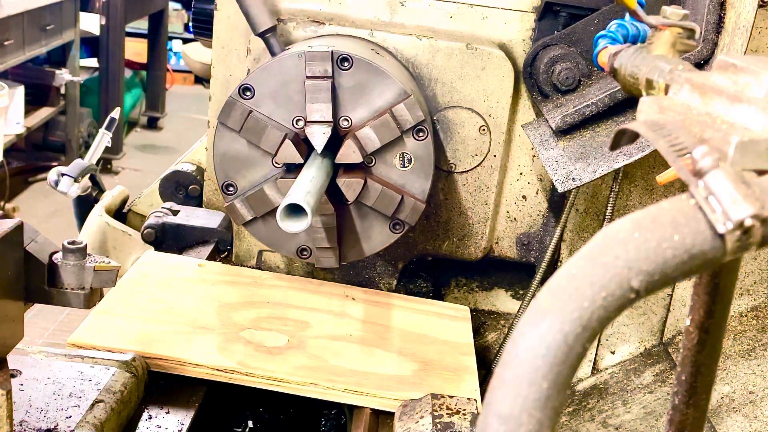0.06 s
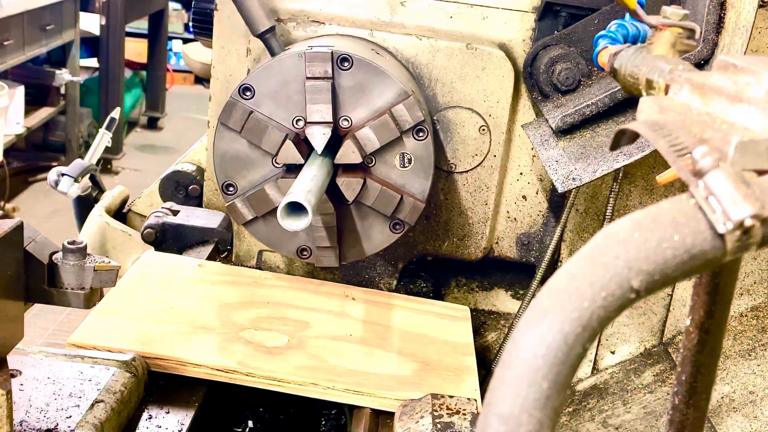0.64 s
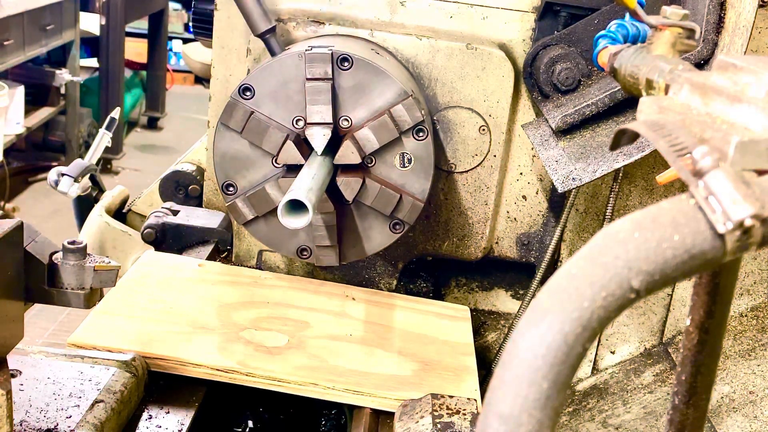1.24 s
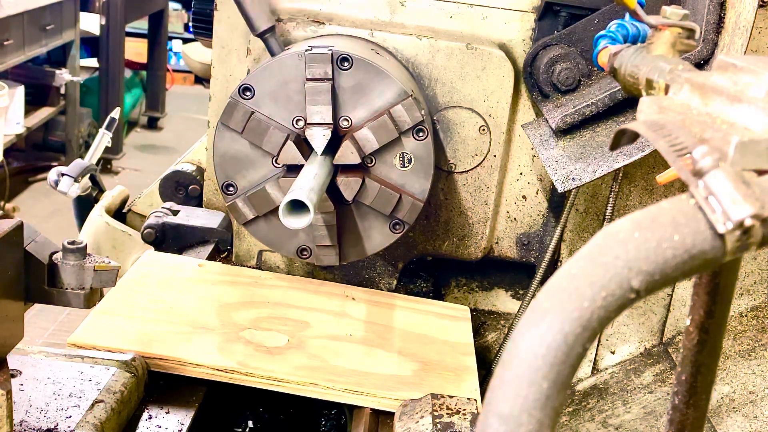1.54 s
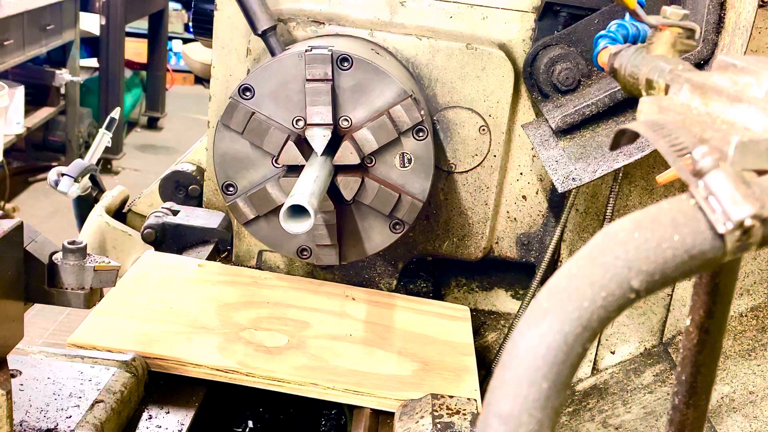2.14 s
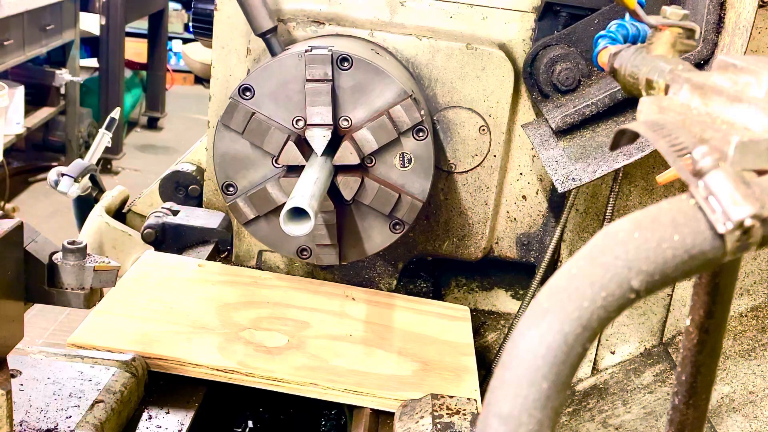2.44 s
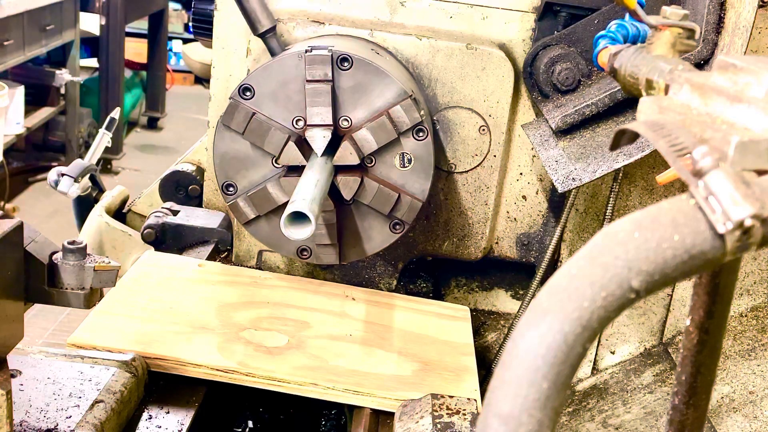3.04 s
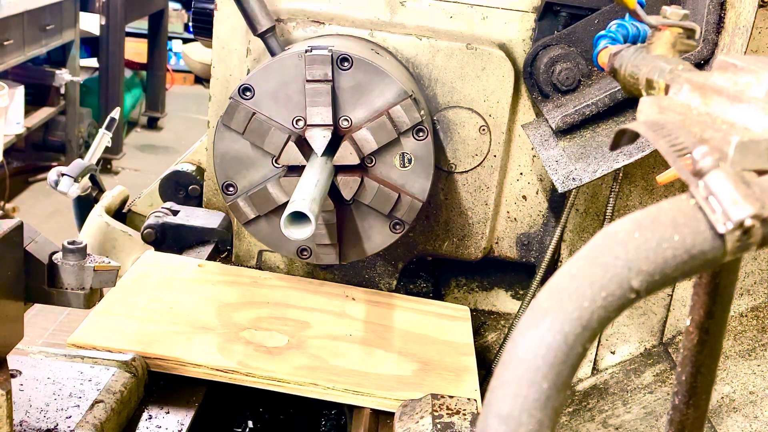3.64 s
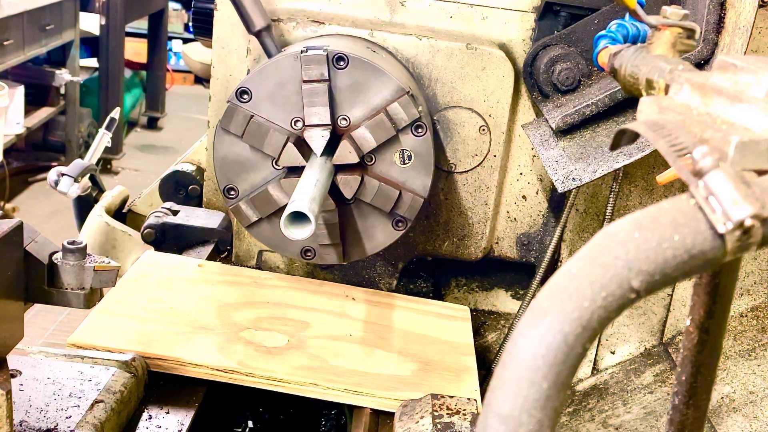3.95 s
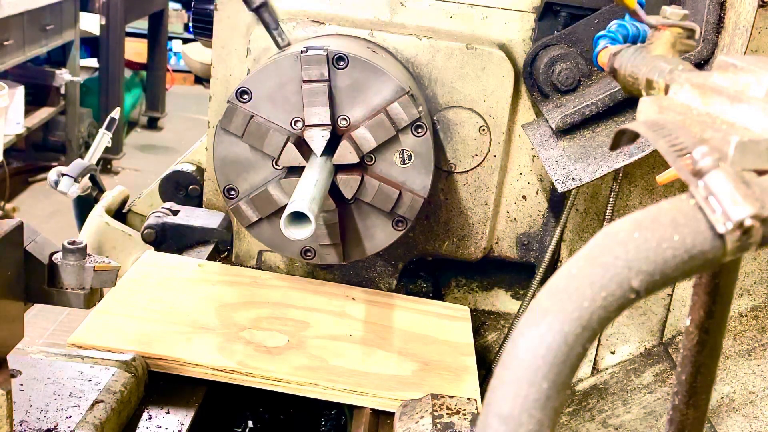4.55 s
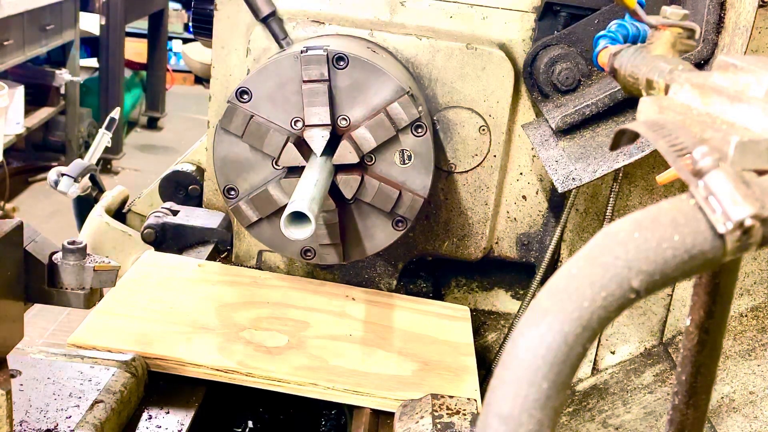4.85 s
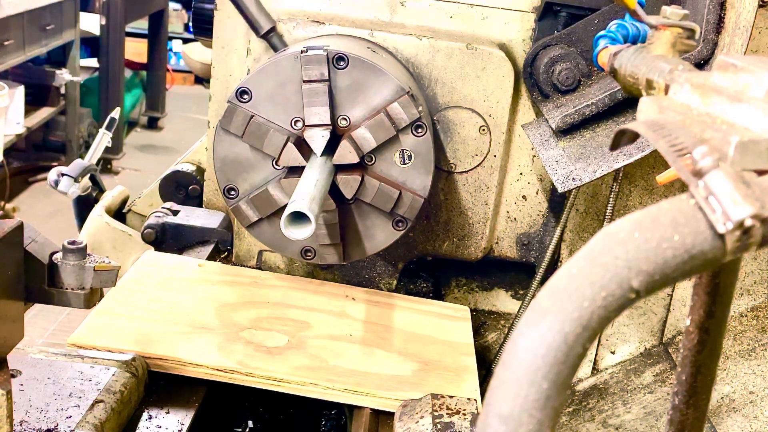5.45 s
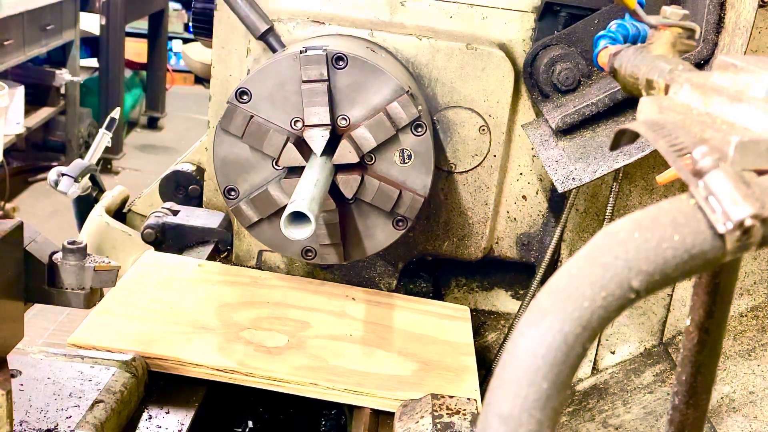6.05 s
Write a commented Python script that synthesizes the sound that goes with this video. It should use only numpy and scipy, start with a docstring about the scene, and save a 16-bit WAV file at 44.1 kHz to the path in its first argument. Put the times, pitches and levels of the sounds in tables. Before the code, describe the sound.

Soft metal knocks from a hand-turned lathe chuck, then three sharp ringing tool clanks and a heavy clunk over a low workshop hum.

```python
"""A lathe chuck is eased round by hand in a humming workshop. Until 3.7 s its drive knocks softly
through the slack, loose parts ring and the spindle rumbles. At 4 s a steel tool scrapes the chuck;
from 4.7 s it clanks against it three times, hardest the last time. A final clunk follows at 5.8 s.
Every blow wakes the lathe's body, scatters off the machine close by and dies away in the shop."""
import sys
import numpy as np
from scipy import signal
from scipy.fft import rfft, irfft
from scipy.io import wavfile

SR = 44100
rng = np.random.default_rng(int(sys.argv[2]) if len(sys.argv) > 2 else 0)


def wrap_up_sound(samples):
    """Save the sound to the file named by the first command line argument, as 16-bit audio."""
    columns = np.atleast_2d(samples).T
    # keep every value between -1 and 1, then stretch to whole-number steps
    tamed = np.clip(columns, -1, 1)
    steps = np.round(tamed * 32767).astype(np.int16)
    wavfile.write(sys.argv[1], SR, steps)


N = 277830

# Tool blows: (time [s], thud level [dB], thud pitch [Hz], clack level [dB], hardness [dB/octave])
CLANKS = [(4.6703, 9.5, 304, 10.5, -4), (4.9413, 10.5, 300, 3.5, 0.5), (5.2328, 18, 365, 14.5, 3)]
# Tool-on-chuck clack: (frequency [Hz], gain [dB])
CLANK_SPECTRUM = [(150, -13.5), (500, -0.5), (1200, 0.5), (2500, -0.5), (3700, -13.5), (5200, -9.5),
                  (6800, -17.5), (8300, -11), (9800, -28), (12500, -23)]
# Headstock resonances and dips: (centre [Hz], width [Hz], gain [dB])
HEADSTOCK_RESONANCES = [(336.5, 170, 5), (559, 170, -3.5), (754, 48, 5.5), (3340, 670, -1),
                        (11500, 500, -3), (13100, 640, -2.5)]

def tool_clanks(shop):
    """Steel strikes the chuck: crack, ringing modes, tick and shimmer."""
    out = np.zeros((2, N))
    for spot, (time_s, *contact) in enumerate(CLANKS):
        colour = contact_spectrum(CLANK_SPECTRUM, *contact)
        add(out, time_s, blow(colour, HEADSTOCK_RESONANCES, shop, rise_s=.001, body_db=-1.1, room_db=.34))
        add(out, time_s + .00077, steel_ring(spot, shop))
        add(out, time_s + .0014, tick(colour))
        add(out, time_s + .0015, shimmer(colour))
    return out


# Steel modes: (frequency [Hz], t60 [s], level at spot 0 [dB], at spot 1 [dB], at spot 2 [dB])
STEEL_MODES = [(1870, .08, -29, -31, -33), (2440, .06, -33, -42, -24), (2520, .048, -30, -41, -9),
               (2680, .06, -28, -35, -27), (4580, .036, -30, -22, -38), (4950, .025, -48, -32, -25),
               (6140, .11, -50, -55, -27), (6560, .05, -45, -55, -36), (7060, .06, -58, -50, -31),
               (7900, .08, -43, -50, -26), (8200, .06, -52, -50, -26), (9200, .08, -62, -55, -30),
               (10760, .05, -46, -47, -25), (10950, .05, -50, -50, -28), (12200, .06, -50, -39, -26),
               (13870, .07, -70, -60, -26)]

def steel_ring(spot, shop, rise_s=.00069, twin_db=-9, size=8192):
    """Close mode pairs, damped by the hand; the shop holds each tone much longer."""
    t, out = np.arange(size) / SR, np.zeros((2, 2 * SR))
    for hz, t60, *spot_db in STEEL_MODES:
        phase, twin_phase = rng.uniform(0, 2 * np.pi, (2, 1, 1)) + .17 * rng.standard_normal((2, 2, 1))
        twin_hz = hz + 30 * np.sqrt(hz / 2500) * rng.choice([-1, 1])
        pair = np.sin(2 * np.pi * hz * t + phase)
        pair += gain_of(twin_db) * np.sin(2 * np.pi * twin_hz * t + twin_phase)
        envelope = gain_of(spot_db[spot] + 3 - 60 * t / t60) * (1 - np.exp(-t / rise_s))
        ring = unit_rms(pair * envelope) * np.sqrt(np.mean(envelope ** 2) / 2)
        add(out, 0, ring)
        add(out, 0, gain_of(read(SHOP_GAIN, hz)) * equal_energy_echo(ring, shop))
    return out


def tick(colour, level_db=-5, size=2048):
    """Steel meets steel: one bright, dry spike."""
    hz = bins(size)
    highpass_db = -10 * np.log10(1 + (3500 / (hz + 50)) ** 2)
    spike = filtered(signal.unit_impulse(size), read(colour, hz) + level_db + highpass_db)
    return np.array([spike, spike])


def shimmer(colour, level_db=-55, mean_t60_s=.31, count=60, size=20000):
    """Faint high modes of jaws, handles and guards, driven by the blow's treble."""
    t, out = np.arange(size) / SR, np.zeros((2, size))
    for hz in np.geomspace(2900, 14000, count):
        detune, life, strength = rng.random(3)
        mode_hz = hz * (1 + .056 * (detune - .5))
        mode_db = level_db + read(colour, hz) + 17 * (strength - 2)
        envelope = gain_of(mode_db - 60 * t / (mean_t60_s * (.5 + life)))
        out += envelope * np.sin(2 * np.pi * (mode_hz * t + rng.random((2, 1))))
    return out


# Scrape envelope: (time [s], level [dB])
SCRAPE_LEVEL = [(3.96, -78), (3.99, -63), (4.005, -49), (4.03, -57.5), (4.05, -74), (4.09, -88)]
# Steel rasp: (frequency [Hz], gain [dB])
SCRAPE_SPECTRUM = [(400, -21), (750, 14.5), (1400, -16), (1900, 5.5), (2200, -4), (2600, 6.5), (3400, -15),
                   (4200, -16), (4600, 1.5), (5400, -15), (6500, -9), (13000, -26)]

def tool_scrape(shop, grain_db=4, room_db=-2):
    """Tiny slips of steel on steel."""
    slips = noise_pair(N, MACHINE_COHERENCE) * gain_of(grain_db * drift(120))
    level_db = np.interp(np.arange(N) / SR, *np.transpose(SCRAPE_LEVEL), left=-np.inf, right=-np.inf)
    rasp = shaped_noise(slips, SCRAPE_SPECTRUM) * gain_of(level_db)
    return rasp + gain_of(room_db) * signal.fftconvolve(rasp, shop, axes=1)[:, :N]


# Drive knocks: (time [s], thud level [dB], thud pitch [Hz], clack level [dB], hardness [dB/octave])
KNOCKS = [(0.188, -8, 380, -21.5, 2.5), (0.399, -5, 400, -17, 1.5), (0.417, 2, 410, -32, -1),
          (0.497, 1, 340, -23, -4), (0.671, -6, 380, -13.5, -3.5), (0.683, 6, 170, -8, -7),
          (0.712, 1.5, 398, -29, 2.5), (0.892, -0.5, 405, -35, 0), (1.111, -1, 168, -10.5, 0),
          (1.124, 10, 224, -7.5, -4), (1.163, 1, 330, -13, -.5), (1.197, 7, 202, -15, -6),
          (1.384, -9, 160, -19.5, 0.5), (1.61, 4, 200, -3, -1.7), (1.628, -2, 380, -5, 5),
          (1.635, 19, 150, -3, 2.7), (1.797, 3, 204, -12.5, -7.5), (2.265, -2, 380, -21, 2.5),
          (2.298, 3.5, 200, -11, -8), (2.375, 2, 160, -14, -16), (2.853, -3.5, 298, -16, -9),
          (2.875, -2, 382, -21, -9), (2.895, -7, 170, -17, -5), (3.064, -3.5, 380, -21, -5),
          (3.17, 1, 313, -32, -6), (3.521, -1, 150, -19, -2.5), (3.631, -6, 300, -16, -5),
          (5.783, 7, 130, -9.5, -1.5), (5.799, 17.5, 91, -0.5, 0), (5.805, 3.5, 380, -0.5, 1.5),
          (5.826, 9.5, 158, -5, 1)]
# Clack of the slack closing: (frequency [Hz], gain [dB])
KNOCK_SPECTRUM = [(140, -11), (380, 1), (1050, 0.5), (2900, -10.5), (6000, -12.5), (10800, -23.5)]
# Chuck resonances and dips: (centre [Hz], width [Hz], gain [dB])
CHUCK_RESONANCES = [(408, 74, 6.5), (1115, 290, 5.5), (1600, 740, -5.5), (2700, 660, 9.5), (3640, 350, 9),
                    (4530, 3300, -4.5), (6230, 1400, 6.5), (9300, 480, 8)]

def drive_knocks(shop):
    """The drive takes up its slack; the last four knocks merge into the clunk."""
    out = np.zeros((2, N))
    for time_s, *contact in KNOCKS:
        colour = contact_spectrum(KNOCK_SPECTRUM, *contact)
        add(out, time_s, blow(colour, CHUCK_RESONANCES, shop, rise_s=.00054, body_db=-4.5, room_db=-3))
    return out


# Loose-part tones: (time [s], frequency [Hz], level [dB], t60 [s])
LOOSE_RINGS = [(0.189, 2700, -58, .06), (0.684, 1050, -47, .06), (1.164, 1170, -46, .07),
               (1.635, 1340, -47, .15), (1.635, 2570, -45, .22), (1.635, 6130, -52, .2),
               (2.299, 1130, -47, .07), (3.064, 3560, -55, .035), (3.631, 3600, -53, .035),
               (3.631, 1130, -52, .07), (5.799, 2400, -38, .04), (5.806, 2640, -37, .04),
               (5.805, 2826, -48, .5), (5.826, 3860, -53, .15), (5.826, 6864, -60, .25)]

def loose_parts(shop):
    """Loose parts ring on after some knocks."""
    t, out = np.arange(SR // 2) / SR, np.zeros((2, N))
    for time_s, hz, db, t60 in LOOSE_RINGS:
        ring = gain_of(db - 60 * t / t60) * np.sin(2 * np.pi * hz * t + rng.random((2, 1)))
        add(out, time_s, ring)
        add(out, time_s, .5 * equal_energy_echo(ring, shop))
    return out


def contact_spectrum(clack_spectrum, thud_db, thud_hz, clack_db, hardness_db_oct, hard_above_hz=1020):
    """Weight makes a thud; harder, shorter contact lifts the treble: (frequency [Hz], gain [dB])."""
    hz = np.geomspace(40, 16000, 120)
    octaves = np.log2(hz / thud_hz)
    slope_db_oct = np.where(octaves < 0, -6.5, -13.5)
    thud = gain_of(thud_db + slope_db_oct * abs(octaves))
    tilt_db = hardness_db_oct * np.log2(np.maximum(hz / hard_above_hz, 1))
    clack = gain_of(clack_db + read(clack_spectrum, hz) + tilt_db)
    return np.c_[hz, 20 * np.log10(np.hypot(thud, clack))]


# Crack decay: (frequency [Hz], t60 [s])
CRACK_T60 = [(120, 0.17), (400, 0.19), (1200, 0.13), (3000, 0.12), (12000, 0.036)]
# Left-right likeness of machine noise: (frequency [Hz], coherence [0..1])
MACHINE_COHERENCE = [(100, .95), (400, 0.7), (800, 0.06), (2500, 0.88), (5500, 0.6), (7200, .55), (8000, 1)]

def blow(colour, resonances, shop, rise_s, body_db, room_db, size=16384):
    """A crack scattered by the machine, its echo in the shop and the body's ring."""
    hz = bins(size)
    lowpass_db = -10 * np.log10(1 + (hz / 14200) ** 40)  # finite contact time
    highpass_db = -10 * np.log10(1 + (75 / (hz + 1)) ** 4)
    db = read(colour, hz) + lowpass_db + highpass_db
    for centre_hz, width_hz, peak_db in resonances:
        db += peak_db / (1 + (2 * (hz - centre_hz) / width_hz) ** 2)
    crack = filtered(noise_burst(size, MACHINE_COHERENCE, CRACK_T60, rise_s), db)
    out = gain_of(room_db) * signal.fftconvolve(crack, shop, axes=1)
    add(out, 0, crack)
    add(out, 0, body_ring(colour, body_db, size))
    return out


# Lathe body modes: (frequency [Hz], level [dB], t60 [s])
BODY_MODES = [(183, -55, .5), (320, -52, .5), (371, -53, .45), (420, -53, .4), (598, -58, .5),
              (743, -48, .42), (960, -52, .25), (1085, -54, .45), (1370, -53, .5), (1690, -50, .38),
              (2050, -54, .3), (2170, -55, .33), (2686, -57, .55)]

def body_ring(colour, level_db, size, rise_s=.0029):
    """The blow's spectrum drives each mode of the lathe's body."""
    t, out = np.arange(size) / SR, np.zeros((2, size))
    for hz, mode_db, t60 in BODY_MODES:
        phase = rng.uniform(0, 2 * np.pi) + .55 * rng.standard_normal((2, 1))
        decay = gain_of(level_db + mode_db + read(colour, hz) - 60 * t / t60)
        out += decay * (1 - np.exp(-t / rise_s)) * np.sin(2 * np.pi * hz * t + phase)
    return out


# Rumble envelope: (time [s], level [dB])
SPINDLE_LEVEL = [(0, -52.5), (.45, -55), (.9, -57.5), (1.4, -57), (1.8, -51), (2.1, -66), (2.4, -60.5),
                 (3.1, -61.5), (3.6, -58), (5.5, -66.5), (6.3, -61.5)]
# Spindle noise: (frequency [Hz], gain [dB])
SPINDLE_SPECTRUM = [(60, -26), (150, 2.5), (400, 2), (600, -10), (1200, -22.5), (2500, -28), (6000, -37.5)]

def spindle_rumble(flutter_db=4.04):
    """The turning spindle rumbles unevenly."""
    rumble = shaped_noise(noise_pair(N, MACHINE_COHERENCE), SPINDLE_SPECTRUM)
    level_db = np.interp(np.arange(N) / SR, *np.transpose(SPINDLE_LEVEL))
    return rumble * gain_of(level_db + flutter_db * drift(14))


# Motor tones: (frequency [Hz], level [dB])
MOTOR_TONES = [(32, -65.5), (57.7, -63), (64.7, -46), (120, -54), (199, -61.5), (240, -69), (292, -74.5),
               (359, -65), (592, -74.5)]

def motor_hum(waver_rad=.49, throb_db=.3):
    """Motors in the shop waver and beat against each other."""
    t, out = np.arange(N) / SR, np.zeros(N)
    for hz, db in MOTOR_TONES:
        amplitude = np.sqrt(2) * gain_of(db + throb_db * drift(4.5))
        out += amplitude * np.sin(2 * np.pi * hz * t + waver_rad * drift(3.4))
    return out


# Air noise: (frequency [Hz], gain [dB])
AIR_SPECTRUM = [(22, -25), (45, 0.5), (70, -2.5), (105, 1), (145, -12.5), (200, -10), (380, -18.5),
                (500, -22.5), (1000, -27.5), (2000, -36.5), (4000, -45), (6800, -45.5), (11500, -53),
                (15500, -44.5)]
# Its left-right likeness: (frequency [Hz], coherence [-1..1])
AIR_COHERENCE = [(60, 1), (130, 0.83), (290, 0.37), (640, -0.41), (1400, 0.014), (3100, 0.52), (6800, 0.41),
                 (8000, 1)]

def moving_air(level_db=-47):
    """Moving air makes a steady low rush."""
    return gain_of(level_db) * shaped_noise(noise_pair(N, AIR_COHERENCE), AIR_SPECTRUM)


# Reverb decay: (frequency [Hz], t60 [s])
SHOP_T60 = [(150, 0.64), (500, 0.57), (2500, 0.87), (6000, 0.7), (13000, 0.5)]
# Reverb tail colour: (frequency [Hz], gain [dB])
SHOP_GAIN = [(150, 8.5), (500, -6.5), (1500, -10.5), (3000, -11.5), (6000, -11), (13000, -14.5)]

def shop_response(predelay_s=.006, early_db=-9, size=40960):
    """Impulse response of the shop: early scatter and a diffuse tail."""
    coherence = [(100, 1), (700, .13), (2500, .47), (7000, .33), (8000, 1)]
    tail = filtered(noise_burst(size, coherence, SHOP_T60, rise_s=.0015), read(SHOP_GAIN, bins(size)))
    early = noise_burst(size, coherence, t60_table=[(200, .25), (8000, .23)], rise_s=.0091)
    return np.pad(tail + gain_of(early_db) * early, ((0, 0), (round(predelay_s * SR), 0)))


def equal_energy_echo(ring, shop):
    """The shop's echo of a tone, scaled to the tone's energy."""
    echo = signal.fftconvolve(ring, shop, axes=1)
    return echo * np.linalg.norm(ring) / np.linalg.norm(echo)


def noise_burst(size, coherence, t60_table, rise_s):
    """Stereo noise decaying at its own rate per band; roughly flat overall."""
    t, hz = np.arange(size) / SR, bins(size)
    spectrum = rfft(noise_pair(size, coherence))
    centres_hz = np.geomspace(120, 14000, 10)
    out = np.zeros((2, size))
    for centre_hz, one_hot in zip(centres_hz, np.eye(len(centres_hz))):
        weight = read(np.c_[centres_hz, one_hot], hz)
        envelope = (1 - np.exp(-t / rise_s)) * gain_of(-60 * t / read(t60_table, centre_hz))
        out += unit_rms(irfft(spectrum * weight) * envelope) * np.sqrt(np.mean(weight ** 2) / size)
    return out


def noise_pair(size, coherence):
    """Stereo white noise with the given coherence."""
    left, independent = rfft(rng.standard_normal((2, size)))
    shared = np.clip(read(coherence, bins(size)), -1, 1)
    right = shared * left + np.sqrt(1 - shared ** 2) * independent
    return irfft(np.array([left, right]), size)


def shaped_noise(noise, spectrum):
    """Scene-long noise coloured by a table, rms 1."""
    return unit_rms(irfft(rfft(noise) * gain_of(read(spectrum, bins(N))), N))


def drift(max_hz):
    """Smooth random wander, rms 1."""
    t = np.arange(0, N / SR + .02, .002)
    rates_hz = np.geomspace(max_hz / 10, max_hz, 20)
    sines = sum(np.sin(2 * np.pi * (hz * t + rng.random())) / np.sqrt(hz) for hz in rates_hz)
    return np.interp(np.arange(N) / SR, t, unit_rms(sines))


def filtered(x, db):
    """Minimum-phase filter, one gain per bin."""
    cepstrum = irfft(np.log(gain_of(db)))
    half = len(cepstrum) // 2
    cepstrum[1:half] *= 2
    cepstrum[half + 1:] = 0
    return irfft(rfft(x) * np.exp(rfft(cepstrum)))


def gain_of(db):
    """Decibels to amplitude."""
    return 10 ** (np.asarray(db) / 20)


def unit_rms(x):
    """Scales to rms 1."""
    return x / np.sqrt(np.mean(x ** 2) + 1e-20)


def read(table, hz):
    """Interpolates on a log-frequency axis."""
    table_hz, values = np.transpose(table)
    return np.interp(np.log(hz + 1), np.log(table_hz + 1), values)


def bins(size):
    """FFT bin frequencies [Hz]."""
    return np.fft.rfftfreq(size, 1 / SR)


def add(mix, time_s, sound):
    """Mixes in a stereo sound."""
    part = mix[:, round(time_s * SR):][:, :sound.shape[1]]
    part += sound[:, :part.shape[1]]


def scene():
    """Tool, chuck and background in one shop, all slightly to the right."""
    shop = shop_response()
    lathe = tool_scrape(shop) + tool_clanks(shop) + drive_knocks(shop) + loose_parts(shop)
    background = motor_hum() + moving_air() + spindle_rumble()
    return lathe * gain_of([[-.8], [.8]]) + background * gain_of([[-.9], [.8]])


# Left microphone port against right: (frequency [Hz], phase lead [rad])
PORT_PHASE = [(0, 0), (700, -.4), (1900, .4), (2700, 0), (3600, -.6), (4600, -.5), (5300, -1.4),
              (6100, -.5), (7200, -.4), (7700, 3.1), (9000, 3.3), (10000, 6.2), (11500, 6.4), (12700, 9.3),
              (13800, 9.7), (14700, 12.5)]
# Microphone response: (frequency [Hz], gain [dB])
MIC_RESPONSE = [(1000, -1), (12200, -0.5), (14000, -0.5), (15000, -19.5), (16000, -2)]

def record(dry, cutoff_hz=15900):
    """Two microphone ports differ in phase, dull the top and limit the band."""
    size = N + 4096
    hz = bins(size)
    phase_shift = np.exp(1j * np.array([[.5], [-.5]]) * read(PORT_PHASE, hz))
    pair = irfft(rfft(dry, size) * phase_shift * gain_of(read(MIC_RESPONSE, hz)), size)[:, :N]
    lowpass = signal.firwin(511, cutoff_hz, window=("kaiser", 9), fs=SR)
    return signal.oaconvolve(pair, lowpass[None], "same")


dry = scene()
out = record(dry)
wrap_up_sound(out)
```